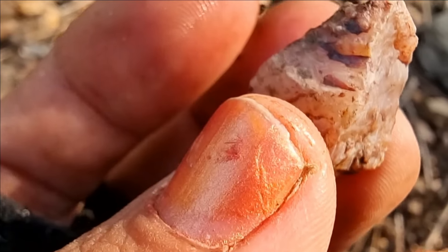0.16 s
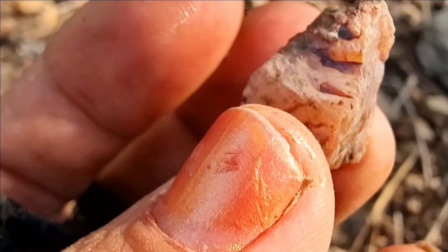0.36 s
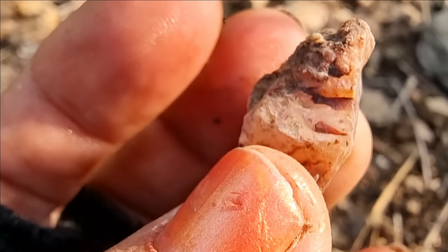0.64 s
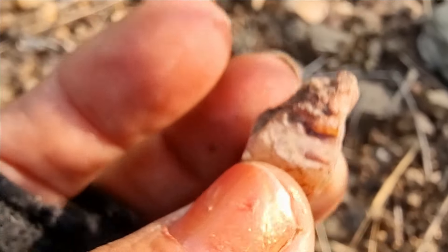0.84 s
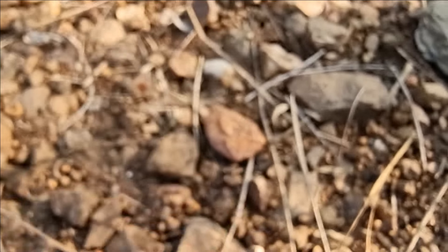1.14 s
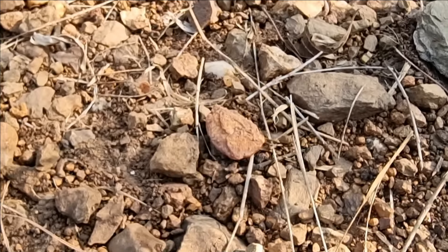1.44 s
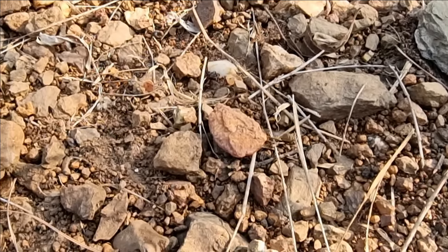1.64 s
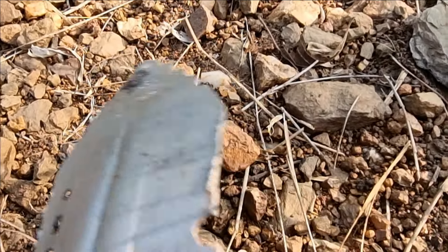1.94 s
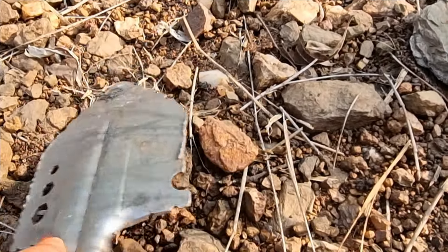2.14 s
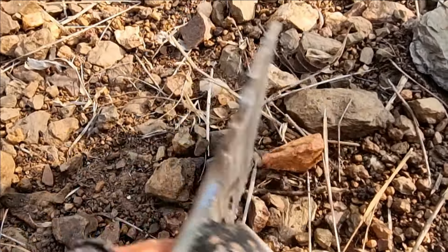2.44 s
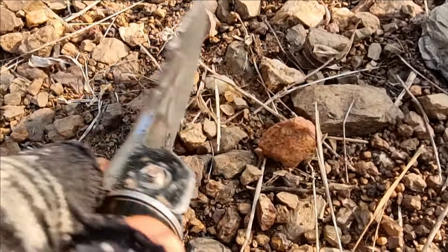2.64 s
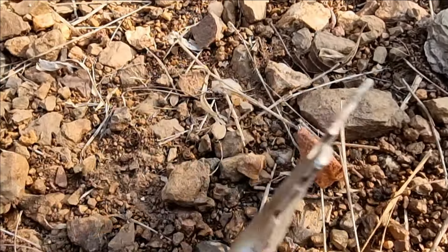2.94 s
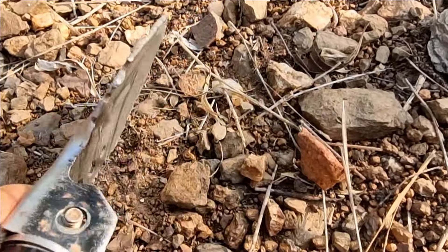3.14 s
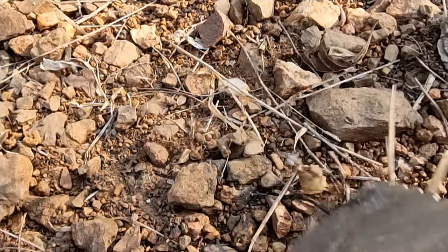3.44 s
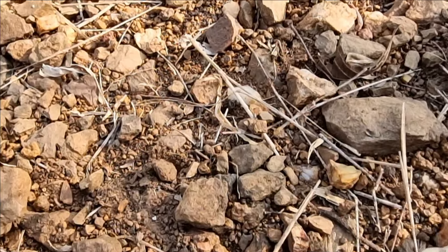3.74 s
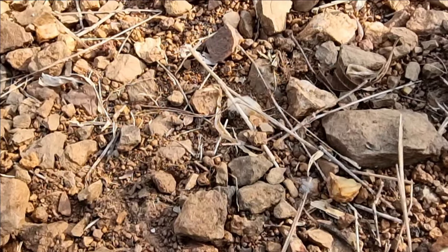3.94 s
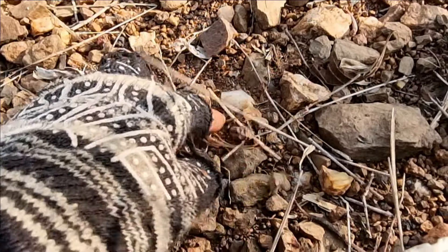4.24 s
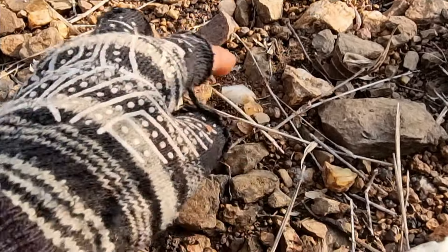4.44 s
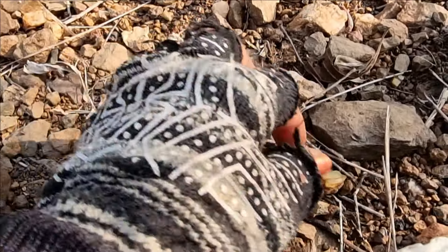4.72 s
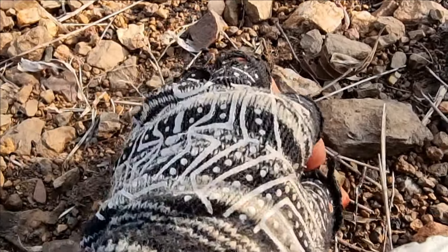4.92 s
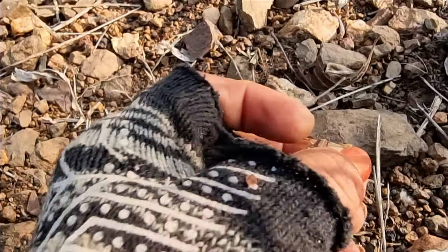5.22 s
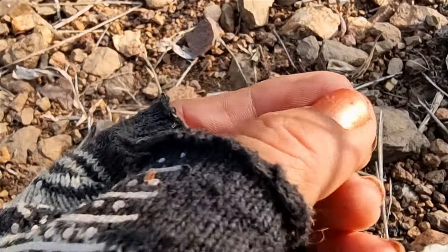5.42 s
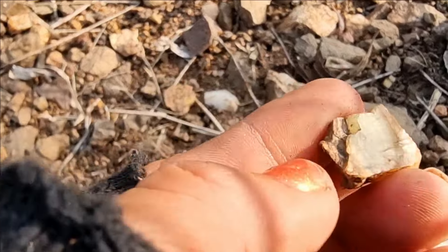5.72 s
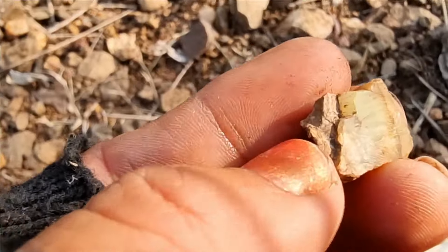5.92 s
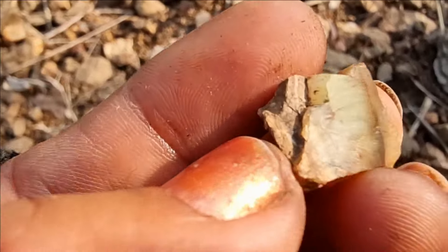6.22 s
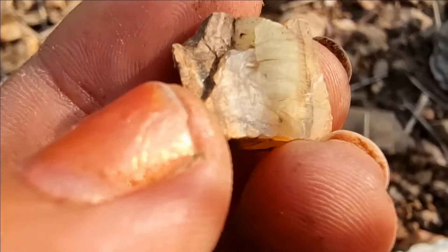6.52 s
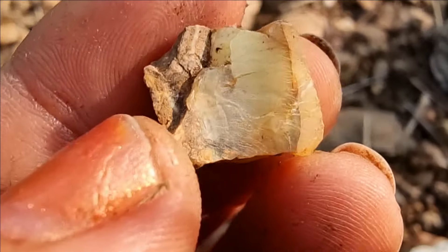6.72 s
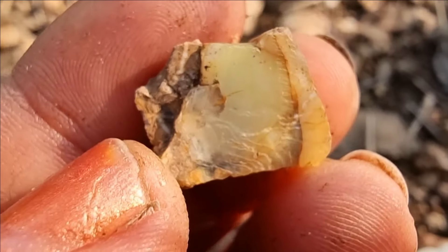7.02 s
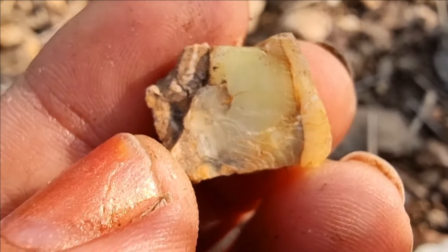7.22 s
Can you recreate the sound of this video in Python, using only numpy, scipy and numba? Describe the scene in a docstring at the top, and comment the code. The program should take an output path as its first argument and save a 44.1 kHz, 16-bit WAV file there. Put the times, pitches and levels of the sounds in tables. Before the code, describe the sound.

A quiet outdoor start with soft wind, then a faint crunch of digging a little way off. Right by the stereo microphone, a metal blade rakes and taps among small stones in uneven strokes, clacking, scraping and ringing, loudest in two bursts. It stops, leaving fine rustling of soil and dry stalks, and slow regular bites of the farther tool with tiny faint knocks.

```python
"""A light wind (low, lumpy noise) and a rustle (fine hiss) last throughout on an open slope. A little way off a tool
bites into loose soil near the start: a swell of crunching noise over a thud. Then a hand works a small steel trowel
through dry gravel for about three seconds: stones knock as short cracks, grit scrapes as crackling noise, and the
blade's modes ring, longest when it leaves the ground. From about four seconds the farther bites come about once a
second, with a few faint knocks. Two ports hear it, each with its own colour and echoes, the right one later."""
import sys
import numpy as np
from scipy import signal
from scipy.fft import rfft, irfft, next_fast_len
from scipy.io import wavfile
from numba import njit

SR = 44100
rng = np.random.default_rng(int(sys.argv[2]) if len(sys.argv) > 2 else 0)


def pcm_store(signal):
    """Save signal as 16-bit PCM."""
    levels = np.round(np.clip(np.atleast_2d(signal), -1, 1) * 32767)
    wavfile.write(sys.argv[1], SR, levels.astype(np.int16).T)


N = 325061
PAD = next_fast_len(N)
TIME = np.arange(N) / SR
HZ = np.maximum(np.fft.rfftfreq(N, 1 / SR), 1)

# how much of a noise both ports share: pitch_hz, share (0 to 1)
LIKENESS = [(60, .9), (300, 0.27), (1000, 0.27), (4000, 0.18), (16000, 0.077)]
# knocks of stone and steel: start_s, peak_db, centre_hz, blade_ring_db
KNOCKS = [(1.151, -22.5, 3640, -12.5), (1.16, -25.5, 5450, -44), (1.3265, -32.5, 3960, -19),
          (1.347, -36.5, 3930, -23), (1.3745, -32, 5000, -32), (1.557, -12, 4603, -22),
          (1.592, -25, 1990, -4.5), (1.695, -29.5, 1700, -1), (1.709, -26.5, 1790, -12),
          (1.725, -19.5, 1740, -11), (1.7563, -31.5, 1830, 2), (1.79, -27.5, 2680, -20.5),
          (1.8748, -21, 4150, -32.5), (2.0671, -9.5, 4400, -14), (2.0987, -18.5, 2620, -13),
          (2.1602, -13.5, 2620, -11.5), (2.177, -21.5, 4900, -13.5), (2.1991, -11, 2580, -20.5),
          (2.2506, -0.5, 2710, -13.5), (2.2643, -0.5, 4600, -21.5), (2.279, -5.5, 4550, -21.5),
          (2.288, -3.5, 4550, -21), (2.2972, -4, 3540, -19.5), (2.304, -5, 4596, -20),
          (2.333, -9, 4770, -16.5), (2.4843, -36, 6400, -27), (2.5981, -26, 4340, 0),
          (2.6345, -22.5, 4350, -16), (2.681, -29.5, 4720, -10), (2.6971, -20, 5250, -21.5),
          (2.7882, -11, 4800, -23.5), (2.7996, -26.5, 5140, -12.5), (2.825, -33.5, 4590, -22),
          (2.8564, -5.5, 4440, -9.5), (3.2054, -39.5, 2240, -11), (3.234, -21, 5200, -10.5),
          (3.2689, -17.5, 3570, -12.5), (3.3247, -7.5, 2900, -25), (3.3417, -10, 6500, -2.5),
          (3.3569, -0.5, 6520, -23.5), (3.4163, -3, 4630, -10.5), (3.4715, -9, 4710, -16.5),
          (3.547, -14.5, 4770, -23), (3.6397, -6, 4710, -14.5), (3.689, -19.5, 4430, -18),
          (3.7492, -10, 3090, -19), (3.8288, -18, 4620, -19.5), (3.8846, -36, 1830, -23),
          (3.92, -12.5, 1764, -3.5), (3.964, -24, 1870, -19.5), (4.011, -20, 1345, -5.5),
          (4.0165, -21.5, 4400, -28.5), (4.0387, -19, 1870, -25), (4.0967, -31, 4180, -27),
          (4.252, -40.5, 4100, -2), (4.2953, -38, 4150, -7), (4.512, -47, 4000, -35),
          (4.555, -52, 4000, -28), (4.594, -37.5, 3960, -5.5), (5.34, -52, 4000, -30),
          (7.103, -51, 3970, -30), (7.256, -52, 3990, -30.5)]
# strokes of the blade through gravel, one list per stroke, pressure heard as grit: time_s, grit_db
STROKES = [
    [(1.29, -90), (1.33, -45.5), (1.39, -62), (1.405, -104)],
    [(1.46, -61), (1.54, -43.5), (1.585, -53.5), (1.62, -68)],
    [(1.66, -51), (1.72, -32.5), (1.8, -40), (1.86, -56.5)],
    [(1.91, -44.5), (1.97, -42.5), (2.03, -90)],
    [(2.075, -32), (2.11, -33), (2.135, -52.5)],
    [(2.15, -53.5), (2.19, -37), (2.215, -24.5), (2.245, -27), (2.29, -18), (2.32, -20.5), (2.36, -52.5),
     (2.47, -63)],
    [(2.49, -48.5), (2.53, -47), (2.58, -60), (2.62, -39.5), (2.66, -57.5), (2.71, -46)],
    [(2.75, -51.5), (2.81, -43), (2.845, -34.5), (2.89, -40.5), (2.96, -61.5), (3.0, -66.5)],
    [(3.225, -48), (3.26, -43.5), (3.3, -35), (3.33, -33.5), (3.365, -30), (3.385, -55.5)],
    [(3.41, -43), (3.44, -21), (3.49, -25), (3.52, -45.5)],
    [(3.54, -44), (3.58, -38.5), (3.62, -45)],
    [(3.67, -47), (3.72, -33), (3.77, -58), (3.81, -37), (3.87, -52)],
    [(3.9, -32.5), (3.95, -37.5), (3.99, -41.5), (4.03, -59), (4.09, -79)],
]


def from_db(db):
    """Turn decibels into a plain multiplier."""
    return 10 ** (np.asarray(db) / 20)


def rms_one(x):
    """Scale to an average strength (rms) of 1."""
    return x / np.sqrt(np.mean(x ** 2) + 1e-20)


def in_time(rows):
    """Draw straight lines through the rows, one curve for each column after the time."""
    s, *columns = np.transpose(rows)
    return [np.interp(TIME, s, c) for c in columns]


def at_hz(points):
    """Read a table at every frequency, in straight lines over octaves."""
    hz, values = np.transpose(points)
    return np.interp(np.log(HZ), np.log(hz), values)


def coloured(x, spectrum):
    """Shape by a spectrum with the least delay (phase from the cepstrum), so nothing sounds early; rms 1."""
    cepstrum = irfft(np.log(from_db(at_hz(spectrum))), N)
    cepstrum[1:N // 2] *= 2
    cepstrum[N // 2 + 1:] = 0
    return rms_one(irfft(rfft(x) * np.exp(rfft(cepstrum)), N))


def drift(rate_hz):
    """Slow chance wandering, spread 1, made at one point in 40 samples."""
    r = np.exp(-80 * np.pi * rate_hz / SR)
    noise = rng.standard_normal(N // 40 + 2002)
    slow = signal.lfilter([1], [1, -2 * r, r * r], noise)[2000:]
    return np.interp(np.arange(N) / 40, np.arange(len(slow)), rms_one(slow))


def pair(likeness, grain=1):
    """Noise for two ports, alike by frequency, both under the same grain."""
    mid, side = rfft(rng.standard_normal((2, N)) * grain, PAD)
    hz, share = np.transpose(likeness)
    alike = np.interp(np.log(np.fft.rfftfreq(PAD, 1 / SR) + 1), np.log(hz), np.clip(share, 0, 1))
    both = np.sqrt(1 + alike) * mid + np.sqrt(1 - alike) * side * [[1], [-1]]
    return irfft(both, PAD)[:, :N] / np.sqrt(2)


def grains(per_s, spread_db, t60):
    """Envelope of random little contacts of very uneven size, each falling 60 dB in t60 seconds; rms 1."""
    sizes = from_db(spread_db * np.minimum(rng.exponential(1, N), 4))
    contacts = sizes * (rng.random(N) < per_s / SR)
    return rms_one(signal.lfilter([1], [1, -from_db(-60 / (t60 * SR))], contacts))


def band(x, low_hz, high_hz):
    """Keep the sound between two pitches."""
    edges = [low_hz, min(high_hz, .45 * SR)]
    return signal.sosfilt(signal.butter(2, edges, "band", fs=SR, output="sos"), x)


def wind():
    """Low noise on the ports, made lumpy by two slow drifts of its level."""
    # colour of the wind: pitch_hz, level_db
    wind_colour = [(12, -29), (20, -8.5), (85, -4), (124, -6.5), (255, -9.5), (380, -14.5), (416, -8),
                   (464, -19), (507, -18), (1500, -33), (1950, -60), (3300, -120)]
    # how much of the wind both ports share: pitch_hz, share (0 to 1)
    wind_likeness = [(60, 1), (250, 0.11), (700, .2)]
    level_db = -69.5 + 1.8 * drift(1.6) + 4.2 * drift(3.9)
    return from_db(level_db) * coloured(pair(wind_likeness), wind_colour)


def rustle():
    """Soil trickles and dry stalks rustle: a fine, slightly grainy hiss."""
    # loudness of the hiss: time_s, level_db
    rustle_levels = [(0, -71.5), (.7, -74), (1.25, -59.5), (2.0, -54.5), (3.0, -62), (3.2, -69.5),
                     (4.0, -50.5), (4.35, -60.5), (4.53, -64.5), (4.6, -55.5), (4.7, -65), (5.0, -65),
                     (5.3, -63), (5.65, -62), (5.85, -67.5), (6.3, -67.5), (6.6, -74.5), (6.9, -64),
                     (7.37, -73)]
    # colour of the hiss: pitch_hz, level_db
    stalk_colour = [(350, -36), (600, -11.5), (957, -10.5), (1280, -4.5), (1660, -6), (2720, -3),
                    (3780, -5.5), (4280, -3), (5560, -8), (13200, -18.5), (16000, -27.5)]
    level_db = in_time(rustle_levels)[0] + 0.33 * drift(5)
    grain = 3.0 + grains(per_s=660, spread_db=3.0, t60=.01)
    return from_db(level_db) * coloured(pair(LIKENESS, grain), stalk_colour)


def bites():
    """The farther tool: a quick swell of crunching gravel that trickles away, over a low thud."""
    # bites into the soil: start_s, crunch_db, thud_db
    bite_rows = [(0.891, -44, -49.5), (4.114, -40.5, -43.5), (5.095, -40.5, -49.5), (5.929, -42.5, -45),
                 (6.855, -41.5, -49.5)]
    # colour of the crunch: pitch_hz, level_db
    crunch_colour = [(290, -73), (500, -8), (595, -13), (1000, -17.5), (1320, -6.5), (2010, -7), (2570, -2),
                     (3700, -0.5), (5160, -1), (12500, -16), (16000, -17.5)]
    rise_s, trickle_t60_s = 0.023, 0.31
    crunch, thud = np.zeros(N), np.zeros(N)
    for start_s, crunch_db, thud_db in bite_rows:
        since = np.maximum(TIME - start_s, 0)
        after_rise = np.maximum(since - rise_s, 0)
        rise = np.minimum(since / rise_s, 1)
        tick = 0.61 * from_db(-60 * since / 0.056)
        swell = (TIME > start_s) * (rise + tick)
        crunch += swell * from_db(crunch_db - 60 * after_rise / trickle_t60_s)
        thud += rise * from_db(thud_db - 60 * after_rise / 0.1)
    grain = 4.0 + grains(per_s=360, spread_db=3.0, t60=0.0066)
    gravel = coloured(pair(LIKENESS, grain), crunch_colour)
    return crunch * gravel + thud * rms_one(band(pair(LIKENESS), 82, 306))


def pebbles():
    """Small stones roll and tap: uneven contacts into a handful of short, low notes."""
    out = 0
    r = from_db(-60 / (0.049 * SR))     # each note falls 60 dB in 49 ms
    for hz in np.geomspace(1200, 2150, 7):
        taps = pair(LIKENESS, 0.11 + grains(per_s=70, spread_db=1.5, t60=.004))
        out = out + signal.lfilter([1, 0, -1], [1, -2 * r * np.cos(2 * np.pi * hz / SR), r * r], taps)
    return rms_one(band(out, 800, 3000))


def hardness(hz):
    """Treble of a knock against its centre, in dB: low knocks are dull ones."""
    hard_db, dull_below_hz, dull_db_per_octave = -12, 2670, 31.5
    return hard_db + dull_db_per_octave * np.minimum(np.log2(hz / dull_below_hz), 0)


def knocks():
    """Each knock is a short crack: a note at its centre pitch, a skirt that brightens with hardness, a thud."""
    tick_t60_s, crack_t60_s, crack_db = 0.0051, 0.047, -7     # a sharp tick, then a weaker crack
    out, t, noise = np.zeros((2, N)), TIME[:int(.1 * SR)], pair(LIKENESS)
    rise = np.minimum(t / 0.00087, 1)
    fall = rise * (from_db(-60 * t / tick_t60_s) + from_db(crack_db - 60 * t / crack_t60_s))
    for start_s, peak_db, hz, _ in KNOCKS:
        at, hard_db = round(start_s * SR), hardness(hz)
        grit = noise[:, at:at + len(t)]
        note = 1.1 * band(grit * fall, hz / 1.09, hz * 1.09)
        note = note + from_db(-.4 * hard_db - 22.5) * fall * np.sin(2 * np.pi * hz * t)
        skirt = from_db(0.54 * hard_db + 2.5) * band(grit * fall, 1400, 6700)
        skirt = skirt + from_db(hard_db) * band(grit * fall ** 2.8, 3700, 13000)
        thud = band(grit * rise * from_db(-60 * t / 0.017), 140, 340)
        crack = note + skirt
        out[:, at:at + len(t)] += from_db(peak_db) * (crack / np.abs(crack).max() + from_db(-16.5) * thud)
    return out


@njit
def ring(force, turn, damping):
    """One mode as a turning arrow that shrinks by its own loss and by whatever touches the blade."""
    out, z = np.zeros(len(force), np.complex128), 0j
    for i in range(len(force)):
        z = z * turn * damping[i] + force[i]
        out[i] = z
    return out


def blade(grit, pressure, drag_db, drag_hz, held_t60):
    """Knocks and dragging grit drive the steel, mostly near their own pitch; hard knocks wake far modes too."""
    # ways the blade can ring (modes): pitch_hz, t60_s (time to fall 60 dB by its own loss)
    blade_modes = [(635, .3), (1285, .2), (1655, .5), (1865, .1), (2170, .12), (2695, .9), (3050, .15),
                   (3294, .1), (3465, .6), (4254, .15), (4650, .11), (4868, .08), (5630, .3), (6450, .22),
                   (6855, .2), (8125, .17), (8590, .22), (9055, .08), (9830, .14), (10625, .14),
                   (11920, .09), (13240, .08), (13750, .1), (15370, .06)]
    # how strongly each mode sounds, in the same order: level_db
    mode_levels = [-18.5, -24.5, -15.5, -7.5, -14, -7.5, -13, -14, -6.5, -5.5, -2.5, -9, -11, 2, -6, -2.5,
                   -0.5, -2, -4, -16.5, -4.5, -10, -20.5, -22.5]
    # the blade clears the soil and rings free: start_s, end_s, t60_s that the palm allows
    free_times = [(1.792, 2.06, 0.46), (2.887, 3.231, 8.5), (3.353, 3.413, 0.23)]
    start_s, peak_db, centre_hz, ring_db = np.transpose(KNOCKS)
    at = np.round(start_s * SR).astype(int)
    luck_db = rng.normal(0, 3, (len(at), len(blade_modes)))
    for start, end, free_t60 in free_times:
        held_t60 = np.where((TIME > start) & (TIME < end), free_t60, held_t60)
    damping = from_db(-60 / (np.maximum(held_t60, .01) * SR))
    drag = grit * from_db(drag_db - 12.5)
    # each mode reaches each port in its own phase
    facing = np.exp(1j * rng.normal(0, .4, (len(blade_modes), 2, 1)))
    out = 0
    for k, (hz, t60) in enumerate(blade_modes):
        near_db = np.maximum(-20.0 * np.abs(np.log2(hz / drag_hz)), -14.5 + 15 * pressure)
        force = drag * from_db(near_db + 3 * drift(15))
        reach_db = np.maximum(-11 * np.abs(np.log2(hz / centre_hz)), hardness(centre_hz) + 5.3)
        force[at] += from_db(peak_db + ring_db + reach_db + luck_db[:, k])
        turn = np.exp(2j * np.pi * hz / SR) * from_db(-60 / (t60 * SR))
        out = out + from_db(mode_levels[k]) * (facing[k] * ring(force, turn, damping)).imag
    return out


def stirred():
    """What the stroke last begun stirs, at every moment."""
    # one row per stroke: pebbles_db and rumble_db (rolling stones and soil at reference pressure), drag_db (share
    # of grit dragging on the steel), drag_hz (pitch region it wakes), held_t60_s (ring that soil and palm allow)
    stir_rows = [(-47, -61, -9, 5650, 0.033), (-49.5, -62, -13.5, 3400, 0.024),
                 (-49.5, -64.5, 2, 1490, 0.029), (-56, -59.5, -18, 2300, .1),
                 (-49.5, -62, -6.5, 1800, 0.18), (-49, -52, -13, 3900, .09),
                 (-54.5, -48, -12.5, 6000, 0.074), (-51, -47, -12, 3680, 0.11),
                 (-42.5, -39, 1.5, 2780, 0.056), (-48.5, -58.5, -13, 5500, 0.14),
                 (-47.5, -73, -8, 1650, 0.21), (-38.5, -75, -13.5, 5000, 0.099),
                 (-46, -56.5, -5.5, 1900, .022)]
    starts = [rows[0][0] - .015 for rows in STROKES]
    return np.transpose(stir_rows)[:, np.maximum(np.searchsorted(starts, TIME) - 1, 0)]


def strokes_only():
    """1 while the blade works, 0 in the pauses, with 8 ms slopes."""
    join_s = .055   # strokes closer than this run into each other
    working = np.ones(N)
    ends = [-1] + [rows[-1][0] for rows in STROKES]
    starts = [rows[0][0] for rows in STROKES] + [9]
    for end, start in zip(ends, starts):
        if start - end > join_s:
            working *= np.interp(TIME, [end, end + .008, start - .008, start], [1, 0, 0, 1])
    return working


def digging():
    """Grit crackles under each stroke, part of it through the blade; pebbles roll, the soil rumbles."""
    # colour of the grit: pitch_hz, level_db
    grit_colour = [(900, -37.5), (1800, -21), (2600, -7.5), (4500, -5), (7000, -5), (11000, -27.5),
                   (16000, -29)]
    grit_db, = in_time(np.vstack(STROKES))
    pebble_db, rumble_db, *steel = stirred()
    over_reference_db = grit_db + 40
    pebble_db = pebble_db + .8 * over_reference_db      # each follows a share of the pressure's swing
    rumble_db = rumble_db + 0.7 * over_reference_db
    working = strokes_only()
    grain = .45 + grains(per_s=400, spread_db=3.8, t60=.007)
    pressure = 0.076 * (grit_db + 26.5)     # a light touch is duller
    grit = coloured(pair(LIKENESS, grain), grit_colour)
    treble = from_db(2.0 * pressure) * band(grit, 7000, 18000)
    grit = from_db(grit_db) * (band(grit, 1400, 6300) + treble)
    soil = pair(LIKENESS, .5 + grains(per_s=40, spread_db=1.0, t60=0.01))
    rumble = from_db(rumble_db) * rms_one(band(soil, 70, 280))
    drag = from_db(grit_db) * working * grain * rng.standard_normal(N)
    stones = working * (grit + rumble + from_db(pebble_db) * pebbles()) + knocks()
    return stones, blade(drag, pressure, *steel)


def delay(ms):
    """A wait in time, as a turn of phase at each frequency."""
    return np.exp(-2j * np.pi * HZ * ms / 1000)


def ports(x, lag_ms, corner_hz):
    """Each port's colour; above a corner the sound bends round the body, lags at the right and gains echoes."""
    # colour of left against right: pitch_hz, left_minus_right_db
    port_tilt = [(60, 4), (110, -1.5), (200, -1.5), (380, -3), (700, 1.5), (1290, -1), (2380, -1.5),
                 (4400, -10), (8120, 1), (15000, 4.5)]
    # echoes off the ground and rocks, one list per port: delay_ms, level_db
    port_echoes = [
        [(.35, -14), (1.3, -16)],
        [(.8, -27.5), (1.9, -31.5)],
    ]
    treble = HZ ** 2 / (HZ ** 2 + corner_hz ** 2)
    paths = np.array([1 + treble * sum(from_db(db) * delay(ms) for ms, db in side) for side in port_echoes])
    paths[1] *= delay(lag_ms * treble)
    colour = from_db(at_hz(port_tilt) * [[.5], [-.5]])
    return irfft(rfft(x) * paths * colour, N)


def scene():
    """Trowel close by, farther tool and rustle, and the wind straight on the ports."""
    stones, steel = digging()
    near = ports(stones, lag_ms=0.64, corner_hz=892) + ports(steel, lag_ms=0.381, corner_hz=287)
    far = ports(bites() + rustle(), lag_ms=.28, corner_hz=150)
    return near + far + wind()


def record(dry):
    """The highest peaks are rounded, the top is cut."""
    cutoff_hz = 16600
    rounded = .9 * np.tanh(dry / .9)
    return signal.sosfilt(signal.cheby2(16, 70, cutoff_hz, fs=SR, output="sos"), rounded)


dry = scene()
out = record(dry)
pcm_store(out)
```